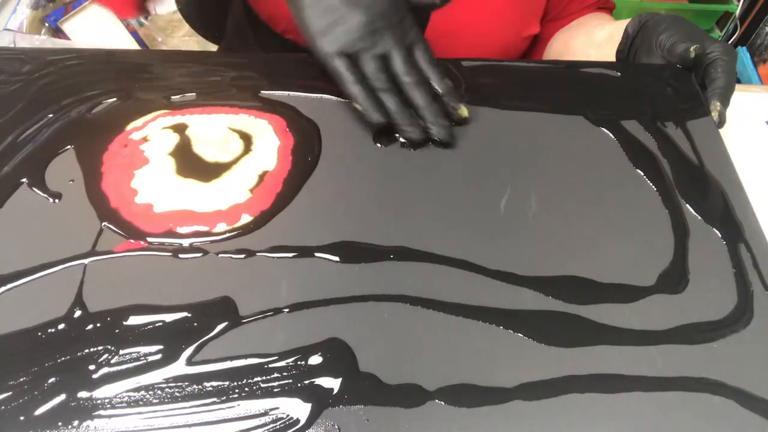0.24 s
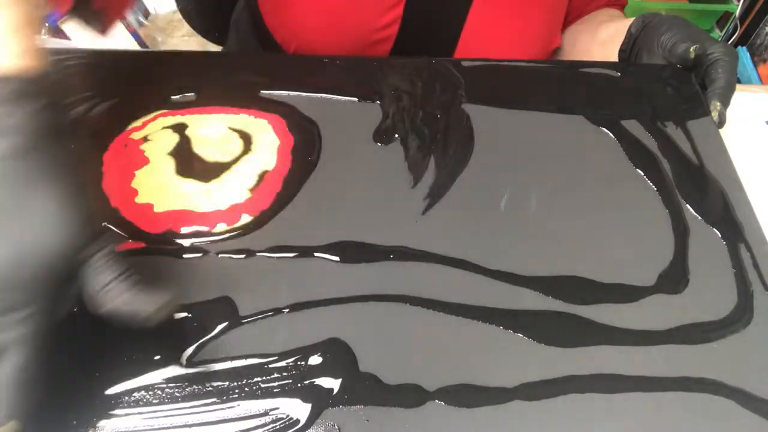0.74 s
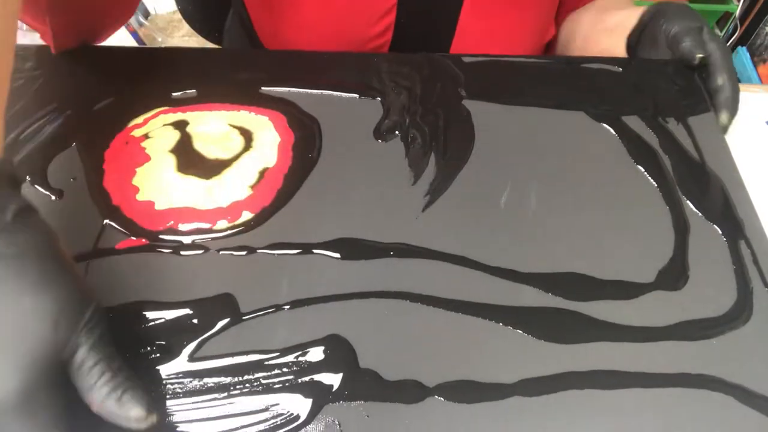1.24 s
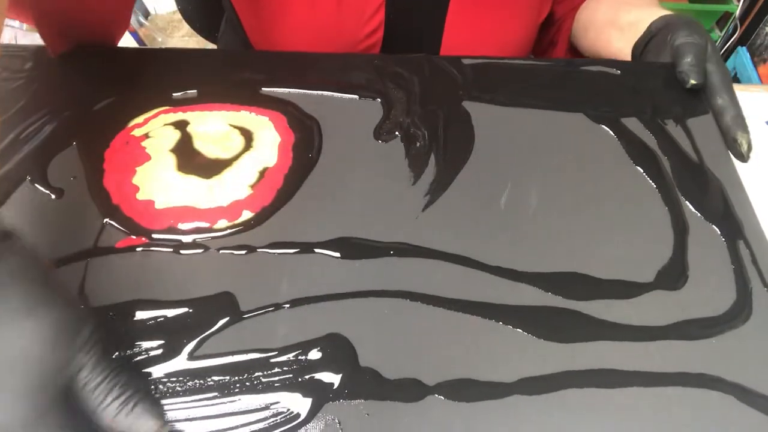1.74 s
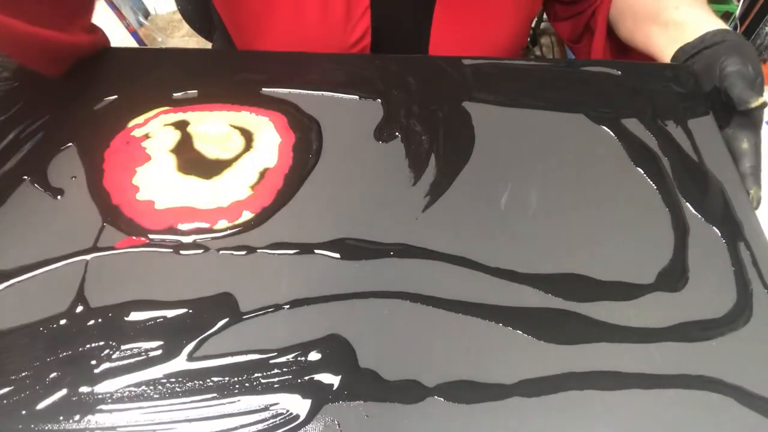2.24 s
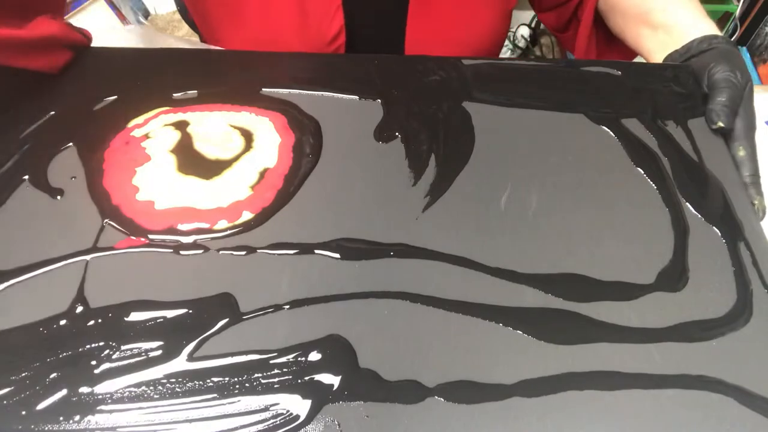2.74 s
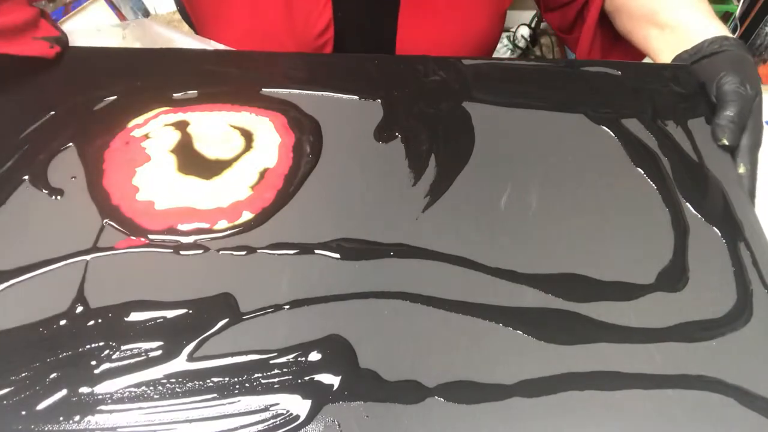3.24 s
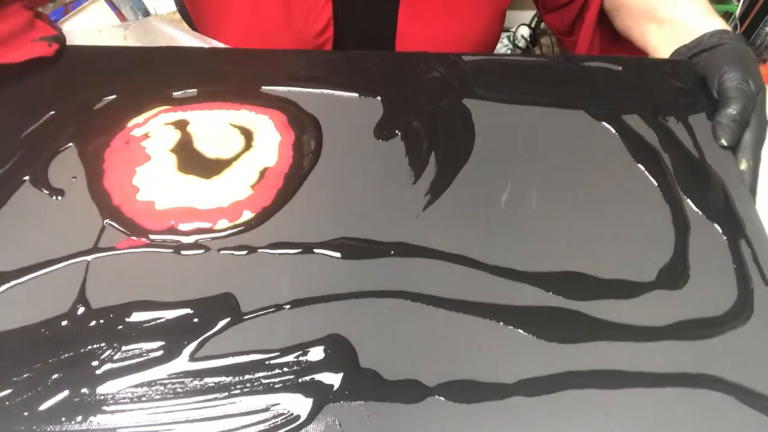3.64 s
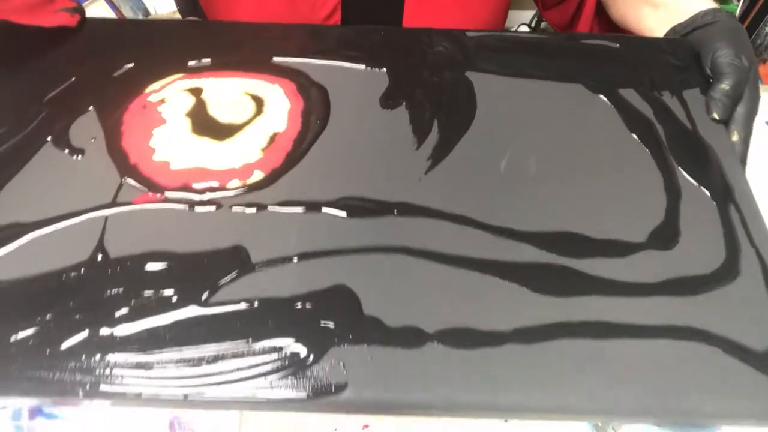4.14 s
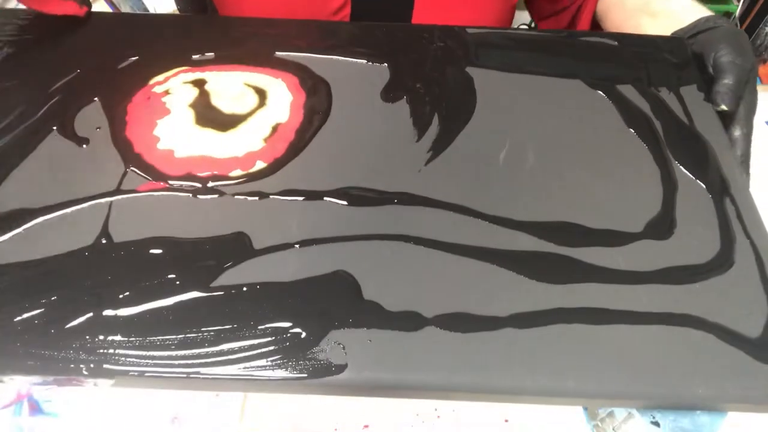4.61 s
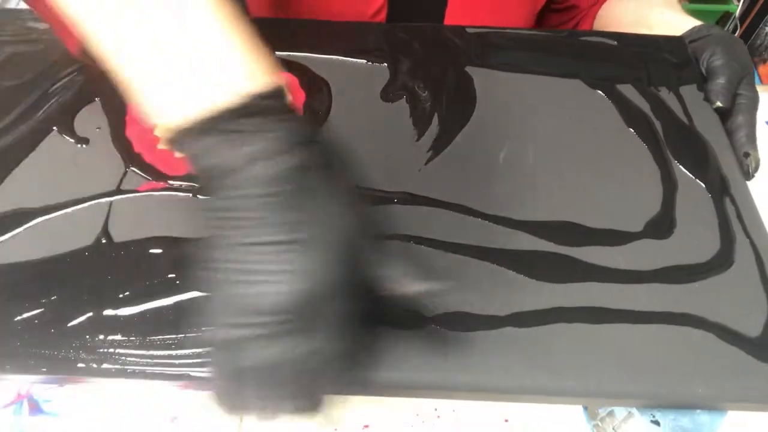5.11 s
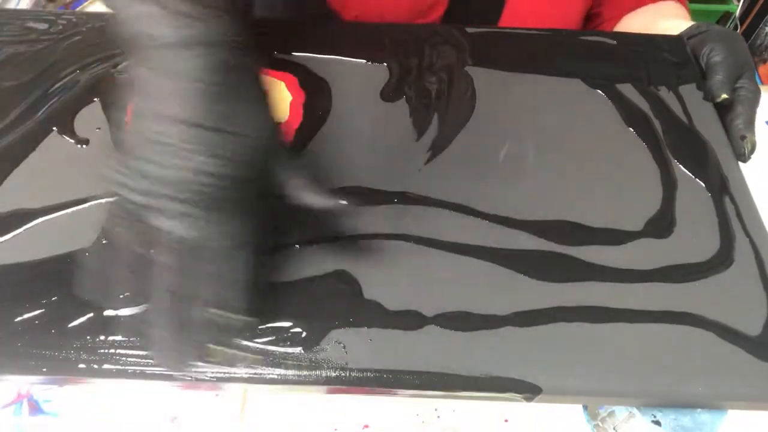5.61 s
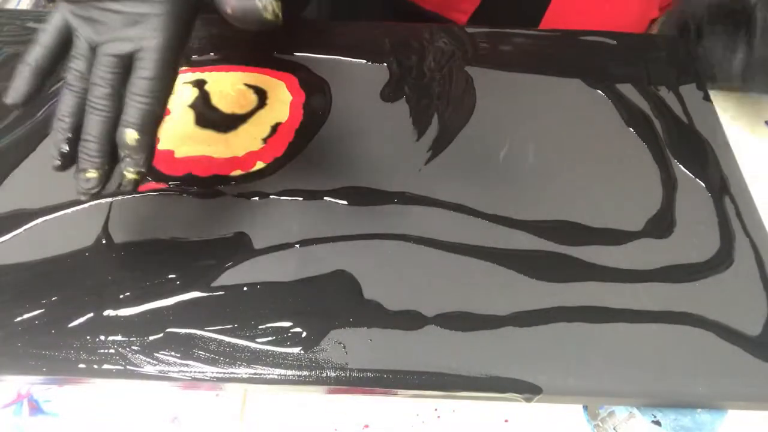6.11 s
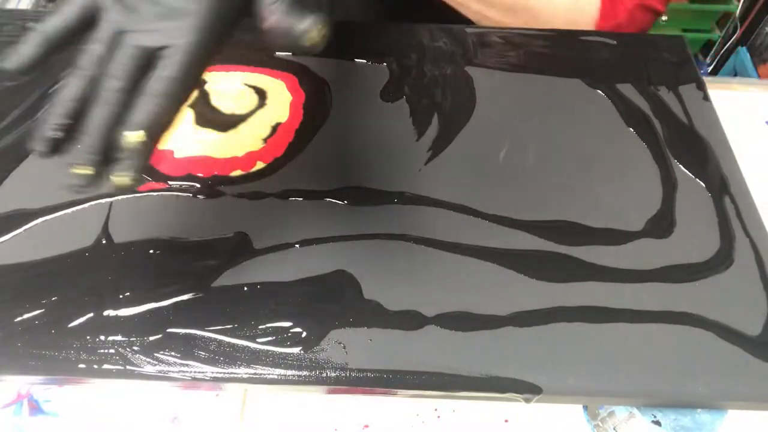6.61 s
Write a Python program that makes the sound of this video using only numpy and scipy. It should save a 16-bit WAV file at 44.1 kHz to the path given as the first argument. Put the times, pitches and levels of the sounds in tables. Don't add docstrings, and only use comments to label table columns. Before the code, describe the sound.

Gloved fingers smear and squeak softly over wet paint on canvas, creasing and ticking, then the frame judders and hums across a table in a quiet room.

```python
import sys
import numpy as np
from scipy import signal
from scipy.fft import rfft, irfft, next_fast_len
from scipy.io import wavfile
from scipy.ndimage import uniform_filter1d, map_coordinates

SR = 44100
rng = np.random.default_rng(int(sys.argv[2]) if len(sys.argv) > 2 else 0)


def invert_db(level):
    return 10 ** (np.asarray(level, dtype=float) / 20)


def inscribe(sig):
    pcm = np.round(np.clip(np.atleast_2d(sig).T, -1, 1) * 32767)
    wavfile.write(sys.argv[1], SR, pcm.astype(np.int16))


N = 302526

# [f/Hz, level/dB, t60/s]
TABLE_MODES = [(74.7, -2, 0.42), (124.4, 7.5, 0.21), (145, 5, 0.35), (179.4, -5, 0.39), (218.3, -6, 0.3)]


def unit(x):
    return x / np.sqrt(np.mean(x ** 2) + 1e-20)


def along(points, hz):
    f, v = np.transpose(points)
    return np.interp(np.log(hz + 1), np.log(f + 1), v)


def curves(rows):
    s, *cols = np.transpose(rows)
    return [np.interp(np.arange(N) / SR, s, c) for c in cols]


def wobble(rate_hz):
    knots = rng.standard_normal(int(N * rate_hz / SR) + 4)
    return map_coordinates(knots, [np.arange(N) * rate_hz / SR])


def filtered(x, response):
    m = next_fast_len(len(x) + SR // 2)
    return irfft(rfft(x, m) * response(np.fft.rfftfreq(m, 1 / SR)), m)[:len(x)]


def band(x, hz, width_hz):
    return filtered(x, lambda f: 1j * f * width_hz / (hz * hz - f * f + 1j * f * width_hz))


def two_bands(x, hz, width_hz):
    return band(band(x, hz, width_hz), hz, width_hz)


def ring(t, hz, db, t60_s, rise):
    decay = invert_db(db - 60 * t / t60_s)
    return decay * (1 - np.exp(-t * hz / rise)) * np.sin(2 * np.pi * hz * t)


def add(out, s, sound):
    out[round(s * SR):][:len(sound)] += sound


def grit(spectrum, catch_db, patchy_db):
    catches = rng.standard_normal(N) * invert_db(catch_db * wobble(900))
    z = signal.stft(catches, nperseg=256)[2]
    field = uniform_filter1d(rng.standard_normal(z.shape), size=5, axis=0)
    field = uniform_filter1d(field, size=12, axis=1)
    patches = signal.istft(z * invert_db(patchy_db * unit(field)), nperseg=256)[1][:N]
    return unit(filtered(patches, lambda hz: invert_db(along(spectrum, hz))))


def contacts(rows, cloth_db, hiss_db, fade_db, square):
    t, power = np.arange(N) / SR, np.zeros((3, N))
    for touch, hardest, lift, db, press_db in rows:
        away = np.interp(t, [touch, hardest, lift], [1, 0, 1])
        swell = invert_db(2 * (db - fade_db * away ** square)) * (away < 1)
        power = power + swell * invert_db([[0], [2 * (cloth_db + press_db)], [2 * hiss_db]])
    return power



def smears():
    # [touch t/s, hardest t/s, lift t/s, rub level/dB, press on the cloth/dB]
    rows = [
        (-.3, .15, 0.24, -61.5, 1.5),
        (.26, .31, 0.31, -67, 8),
        (.3, .44, 0.506, -48.5, 5),
        (.87, 1.0, 1.136, -67.5, 8),
        (1.26, 1.33, 1.506, -61.5, 2),
        (3.3, 3.378, 3.43, -59.5, -13),
        (4.335, 4.356, 4.38, -54, 7),
        (.4, .475, 0.486, -50, -2),
    ]
    power = contacts(rows, cloth_db=-7.5, hiss_db=-5.5, fade_db=24.5, square=2)
    return power, [(1190, 420, -5.5), (4500, 1100, -5)]


def sweeps():
    # [touch t/s, hardest t/s, lift t/s, rub level/dB, press on the cloth/dB]
    rows = [
        (4.5, 5.03, 5.25, -62, -3),
        (4.7, 5.31, 5.4, -61, -9),
        (4.56, 4.6, 4.68, -72.5, -9),
    ]
    power = contacts(rows, cloth_db=-9, hiss_db=-2, fade_db=22.5, square=2.5)
    return power, [(1187, 170, -6.5), (3626, 500.6, -7.5)]


def grips():
    # [touch t/s, hardest t/s, lift t/s, rub level/dB, press on the cloth/dB]
    rows = [(1.54, 1.6, 1.74, -68.5, 15), (1.74, 1.8, 1.91, -72, 17.5), (1.92, 1.975, 2.02, -64.5, -3),
            (2.04, 2.09, 2.41, -64, 12), (2.28, 2.37, 2.54, -58.5, -2.5), (2.4, 2.66, 2.8, -60, 0),
            (2.7, 2.89, 3.14, -65, 3), (3.2, 3.32, 3.8, -71.5, 6), (3.47, 3.55, 3.67, -58.5, 3.5),
            (3.55, 3.66, 3.7, -54.5, 6), (5.7, 5.83, 6.0, -70, 5), (5.95, 6.04, 6.2, -62.5, 10.5),
            (6.3, 6.6, 6.73, -67.5, 10), (6.62, 6.685, 7.2, -70, 8)]
    power = contacts(rows, cloth_db=-9.5, hiss_db=-10.5, fade_db=17.5, square=1.43)
    return power, [(2950, 300, -4), (2060, 180, -14.5)]


def slides():
    # [touch t/s, hardest t/s, lift t/s, rub level/dB, press on the cloth/dB]
    rows = [
        (1.1, 1.225, 1.3, -67.5, -0.5),
        (3.69, 3.727, 3.83, -64.5, -0.5),
        (3.78, 3.9, 3.96, -59.5, -0.5),
        (3.99, 4.06, 4.13, -60.5, 3.5),
        (4.36, 4.42, 4.4, -73, -12),
    ]
    power = contacts(rows, cloth_db=7.5, hiss_db=-33, fade_db=17.5, square=1.7)
    return power, [(3300, 100, -25.5), (1026, 98, 2.5), (480, 54, 0)]


def pulls():
    # [touch t/s, hardest t/s, lift t/s, rub level/dB, press on the cloth/dB]
    rows = [
        (5.36, 5.47, 5.6, -63, 10),
        (5.5, 5.62, 5.69, -49, -2),
        (5.55, 5.712, 5.732, -53.5, -3),
        (5.92, 5.935, 5.985, -61, 4),
    ]
    power = contacts(rows, cloth_db=-16.5, hiss_db=-6, fade_db=13.5, square=1.5)
    return power, [(2700, 130, -10.5), (4300, 570, -5)]


def hauls():
    # [touch t/s, hardest t/s, lift t/s, rub level/dB, press on the cloth/dB]
    rows = [
        (4.05, 4.15, 4.14, -62, 7),
        (4.14, 4.25, 4.36, -64, 10.5),
        (4.22, 4.31, 4.36, -65.5, 6),
    ]
    # [f/Hz, width/Hz, level over rub/dB]
    rings = [(3570, 300, -2), (1000, 350, 11), (480, 90, 12), (215, 30, 17)]
    return contacts(rows, cloth_db=11, hiss_db=-21, fade_db=12.5, square=1), rings


def settles():
    # [touch t/s, hardest t/s, lift t/s, rub level/dB, press on the cloth/dB]
    rows = [
        (6.066, 6.078, 6.33, -50.5, 0),
    ]
    power = contacts(rows, cloth_db=2.5, hiss_db=-21, fade_db=31, square=0.52)
    return power, [(350, 130, 7), (1200, 420, 0)]


def fingers():
    # [f/Hz, level/dB per Hz]
    rub_spectrum = [(880, -14), (1500, -8.5), (2220, -7), (2660, -2.5), (2880, -3.5), (4350, -3.5),
                    (5390, -14.5), (6340, -12), (7500, -15.5), (9750, -45), (16500, -120)]
    cloth_spectrum = [(130, -16), (220, -7.5), (339, -6.5), (374, -8.5), (489, -1.5), (635, -8),
                      (881, -8.5), (2200, -23.5), (2860, -61), (4840, -120)]
    hiss_spectrum = [(3240, -45), (5500, 0), (6350, -8.5), (8560, -6), (9920, -7), (10300, -16),
                     (11200, -7), (13900, -10.5), (15200, -8), (16000, -53)]
    resting_db = -79
    kinds = [smears(), sweeps(), grips(), slides(), pulls(), hauls(), settles()]
    pressure = invert_db(0.6 * wobble(25) + 0.7 * wobble(70))
    total_power = sum(power for power, _ in kinds) + invert_db(2 * resting_db)
    rub, cloth, hiss = np.sqrt(total_power)
    catches = rng.standard_normal(N) * invert_db(1.5 * wobble(150))
    rings = np.zeros(N)
    for power, colours in kinds:
        for hz, width_hz, db in colours:
            colour = unit(two_bands(catches, hz, 1.5 * width_hz))
            rings += np.sqrt(power[0]) * invert_db(db) * colour
    friction = rub * grit(rub_spectrum, catch_db=0.5, patchy_db=2.87)
    friction += cloth * grit(cloth_spectrum, catch_db=2.5, patchy_db=3.0)
    friction += hiss * grit(hiss_spectrum, catch_db=1.0, patchy_db=1.4)
    return pressure * (friction + rings)


def hum(rows, rough, overtone_db):
    hz, db = curves(rows)
    t = np.arange(N) / SR
    sliding = np.clip(np.minimum(t - rows[0][0], rows[-1][0] - t) / 0.0075, 0, 1)
    phase = 2 * np.pi * np.cumsum(hz * (1 + rough * wobble(60))) / SR
    level = invert_db(db + 3.0 + 61 * rough * wobble(45))
    return sliding * level * (np.sin(phase) + invert_db(overtone_db) * np.sin(2 * phase + 1.6))


def drag():
    # [t/s, f/Hz, level/dB]
    hum_track = [(4.02, 166.6, -54), (4.072, 145, -24.5), (4.1, 142.4, -24.5), (4.112, 142, -34),
                 (4.166, 144.7, -20.5), (4.28, 146.2, -23.5), (4.368, 147.6, -30.5), (4.42, 144.3, -50),
                 (4.47, 139, -52)]
    # [t/s, f/Hz, level/dB]
    judder_tracks = [
        [(3.82, 185, -81), (3.868, 205, -35.5), (3.898, 229, -41.5), (3.93, 245, -35.5), (3.955, 222, -48),
         (3.97, 205, -41), (3.98, 196, -54), (4.004, 191, -32), (4.045, 170, -46)],
        [(4.1, 229.3, -32.5), (4.144, 268, -35), (4.176, 278, -44), (4.198, 268, -40), (4.22, 267.4, -38)],
    ]
    # [t/s, level/dB]
    shift = [(0.0, -66.5), (0.57, -78), (0.92, -68.5), (1.22, -56), (1.9, -66.5), (2.39, -67), (3.3, -69.5),
             (3.6, -63.5), (3.9, -47), (4.24, -35.5), (4.39, -61), (4.47, -71), (4.62, -59.5), (4.79, -71),
             (5.77, -66), (6.06, -55), (6.29, -70), (6.86, -70)]
    noise = rng.standard_normal(N)
    modes = [invert_db(db) * unit(band(noise, hz, 10.2 / t60_s)) for hz, db, t60_s in TABLE_MODES]
    rumble = invert_db(curves(shift)[0] - 4.0) * unit(sum(modes))
    judders = sum(hum(rows, rough=0.051, overtone_db=-23.5) for rows in judder_tracks)
    return hum(hum_track, rough=0.017, overtone_db=-26.0) + judders + rumble


def thump(t):
    return -ring(t, 200, -22 + 9, 0.036, rise=1.08)


def taps():
    # [t/s, peak level/dB, strongest f/Hz, boom level/dB, edge level/dB]
    rows = [(0.216, -48, 565, -21, -16), (0.287, -54.5, 400, -9, -24), (1.175, -44, 506, -1.5, -11.5),
            (1.221, -37.5, 510, -9.5, -9.5), (1.229, -34, 600, -6, -12), (1.298, -46.5, 814, -19, -8),
            (1.415, -51.5, 345, -16.5, -7), (1.565, -35, 630, -21.5, -26.5),
            (1.766, -42.5, 731.5, -6.5, -20), (2.024, -32.5, 665, -9.5, -22), (2.088, -43.5, 480, -2.5, -8),
            (3.31, -43, 227, -18, -16), (3.569, -44.5, 480, -18, -9), (3.717, -52.5, 600, -5, 2),
            (4.045, -23, 620, -11, -16.5), (4.094, -25.5, 645, -4, -17.5), (4.355, -35, 497.4, -10, -4.5),
            (4.385, -33, 920, -7, -33), (4.428, -35, 560.2, -12, -12), (4.663, -53.5, 520, 9, -13),
            (5.178, -41.5, 573, -17.5, -6.5), (6.07, -32.5, 350, -20.5, -8.5),
            (6.128, -47.5, 240, -16, -14), (6.668, -56, 456, -9, 1.5)]
    # [f/Hz, share of the tap's t60]
    frame_modes = [(212, 0.89), (275, 0.81), (345, 0.82), (385, 0.65), (490, 0.94), (590, 1), (650, 0.28),
                   (790, 0.53), (955, 0.49), (1100, 0.5), (1380, 0.3)]
    t60_s = 0.073
    out, t = np.zeros(N + SR), np.arange(SR // 3) / SR
    add(out, 1.2235, thump(t))
    for s, db, centre_hz, boom_db, edge_db in rows:
        luck = rng.standard_normal((2, len(frame_modes) + len(TABLE_MODES)))
        noise = rng.standard_normal((2, len(t)))
        knock = np.zeros(len(t))
        for k, (hz, share) in enumerate(frame_modes):
            mode_db = 3.2 * luck[1, k] - 9 * np.log2(hz / centre_hz) ** 2
            knock += ring(t, hz * (1 + 0.03 * luck[0, k]), mode_db, share * t60_s, rise=2.1)
        boom = ring(t, 54.7, -3.5, 2.9 * t60_s, rise=1.0)
        for k, (hz, level_db, ring_s) in enumerate(TABLE_MODES):
            boom += ring(t, hz, level_db + 3 * luck[1, -k - 1], 9 * ring_s * t60_s, rise=0.88)
        rattle = unit(two_bands(noise[0], centre_hz, centre_hz)) * invert_db(-7.5 - 60 * t / (0.96 * t60_s))
        edge = unit(band(band(noise[1], 1750, 2600), 2300, 3100)) * invert_db(-60 * t / 0.046)
        tap = knock / np.abs(knock).max() + rattle
        tap += invert_db(boom_db + 5.0) * boom / np.abs(boom).max()
        tap += invert_db(edge_db) * edge
        add(out, s, invert_db(db) * tap)
    return out[:N]


def ticks():
    # [t/s, peak level/dB, strongest f/Hz, top level/dB]
    rows = [(0.893, -52, 3320, -17), (1.138, -52.5, 2810, -24), (1.3144, -40.5, 4970, -9),
            (3.9923, -43.5, 5100, -13), (1.6472, -55, 2900, -10), (2.1, -38.5, 2220, -37),
            (2.156, -37.5, 2450, -40), (2.3256, -39.5, 3330, -6), (2.5395, -38.5, 2132, -33),
            (2.591, -43, 2930, -22), (2.905, -36.5, 2900, -46), (2.9673, -41, 2640, -26),
            (3.075, -47.5, 2920, -14), (3.431, -47.5, 2440, -23), (3.832, -45.5, 4500, -25),
            (3.7213, -34.5, 4400, -3.5), (3.939, -43, 4350, -1), (4.3408, -41, 1510, -10.5),
            (4.3462, -25, 3740, -30), (4.354, -26.5, 3300, -34), (4.3561, -20, 8200, -18),
            (4.3626, -32, 3440, -7), (4.4269, -29, 4300, 2.5), (4.469, -46.5, 2600, -25),
            (4.283, -42, 4500, -17), (5.1783, -40.5, 1490, 3), (0.2965, -52, 5000, -10),
            (5.7096, -44, 2900, -3), (5.928, -47, 4400, -12), (6.074, -43, 3095, -31)]
    t60_s = 0.0089
    out, t = np.zeros(N + SR), np.arange(SR // 10) / SR
    for s, db, centre_hz, top_db in rows:
        snap = rng.standard_normal((2, len(t))) * invert_db(-60 * t / t60_s)
        body = band(band(snap[0], centre_hz, 0.49 * centre_hz), centre_hz, 0.92 * centre_hz)
        top = band(band(snap[1], 9800, 8000), 10000, 13000)
        add(out, s, invert_db(db) * (body / np.abs(body).max() + invert_db(top_db) * top / np.abs(top).max()))
    return out[:N]


def room(x):
    # [f/Hz, t60/s]
    walls = [(150, 0.3), (1000, 0.21), (8000, 0.1)]
    hz, t, z = signal.stft(rng.standard_normal(SR // 2), SR, nperseg=256)
    tail = signal.istft(z * invert_db(-60 * t / along(walls, hz)[:, None]), SR, nperseg=256)[1]
    delayed = np.pad(x, (300, 0))
    return signal.fftconvolve(delayed, tail / np.linalg.norm(tail))[:N]


def room_tone():
    # [f/Hz, level/dB per Hz]
    spectrum = [(15, -45), (25, -18.5), (55, -2.5), (92, -10), (242, -17.5), (277, -10), (309, -17.5),
                (394, -10.5), (439, -18), (911, -21), (1100, -18), (4870, -30), (14000, -37.5),
                (16000, -46)]
    return invert_db(-70.1) * grit(spectrum, catch_db=0.1, patchy_db=0.3)


def scene():
    hits = taps() + ticks()
    tone = room_tone()
    return (hits + invert_db(-18.0) * room(hits) + fingers() + drag() + tone)[None]


def top_cut(x):
    return signal.sosfilt(signal.butter(12, 16850, fs=SR, output="sos"), x)


def record(dry):
    return top_cut(dry)


dry = scene()
out = record(dry)
inscribe(out)
```